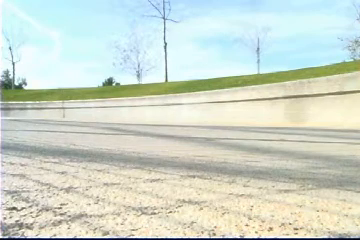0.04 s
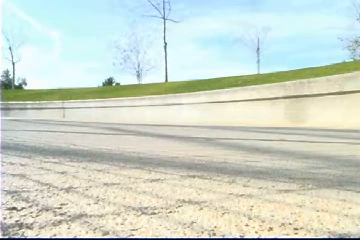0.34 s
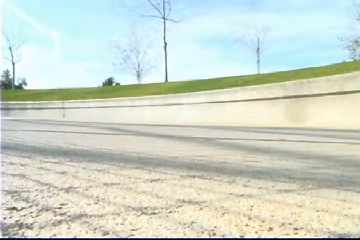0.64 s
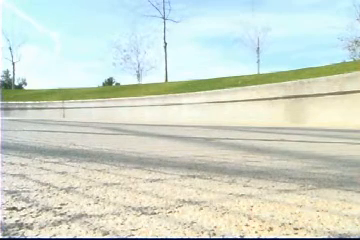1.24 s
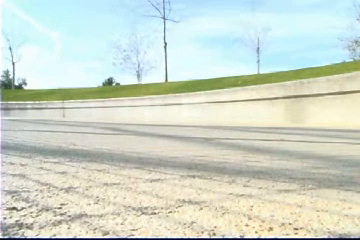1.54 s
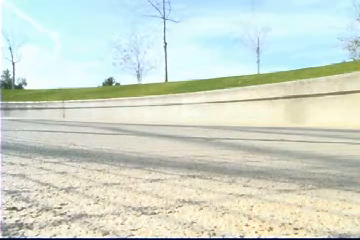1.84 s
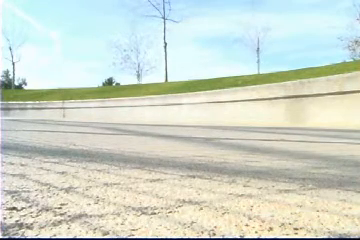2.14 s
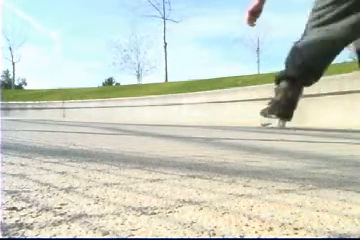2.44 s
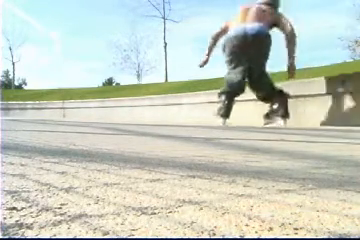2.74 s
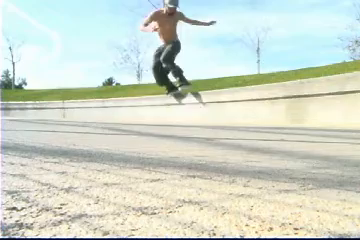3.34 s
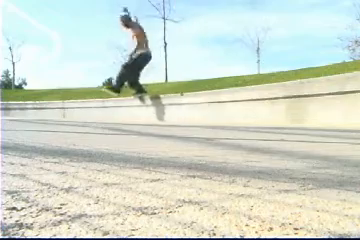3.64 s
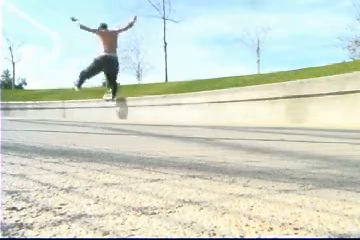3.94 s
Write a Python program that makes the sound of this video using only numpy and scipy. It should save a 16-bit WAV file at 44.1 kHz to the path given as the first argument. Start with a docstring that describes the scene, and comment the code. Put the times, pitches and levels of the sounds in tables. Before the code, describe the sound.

Inline skates roll over rough pavement, then slam onto a concrete ledge and grind along it.

```python
"""Inline skater grinding a ledge

A skater strides up over rough pavement and rolls close past, grit exciting the resonances of wheels
and frames, then jumps. The skates slam onto a concrete ledge, and stick-slip friction rings their
plastic soles as they grind along it, catching on the edge. Behind lie open air, a low distant hum
and a few faint bird chirps."""
import sys
import numpy as np
from scipy import signal
from scipy.fft import rfft, irfft
from scipy.io import wavfile

SR = 44100
rng = np.random.default_rng(int(sys.argv[2]) if len(sys.argv) > 2 else 0)


def pcm_store(signal):
    """Save signal as 16-bit PCM."""
    levels = np.round(np.clip(np.atleast_2d(signal), -1, 1) * 32767)
    wavfile.write(sys.argv[1], SR, levels.astype(np.int16).T)


N = 176400
T = np.arange(N) / SR
GRIND_START_S = 3.2

# Modes of the plastic sole and frame. Each row: frequency in Hz, width in Hz, gain in dB.
SOLE_MODES = [(298, 30, -1), (680, 108, 3.5), (1014, 7.7, 2.5), (2620, 110, -2.5), (3730, 110, 3)]
# Spectrum of the shaken boot. Each row: frequency in Hz, relative level in dB.
BOOT_SPECTRUM = [(20, -62), (120, -16), (290, -2.5), (550, -11.5), (5000, -76)]


def amp(db):
    """Amplitude grows tenfold with every 20 dB."""
    return 10 ** (np.asarray(db) / 20)


def unit(x):
    """Normalisation to an rms of 1."""
    return x / np.sqrt(np.mean(x ** 2) + 1e-20)


def value_at(points, hz):
    """Interpolation of a spectrum along a logarithmic frequency axis."""
    f, value = np.transpose(points)
    return np.interp(np.log(hz + 1), np.log(f + 1), value)


def envelopes(table):
    """Amplitude envelopes, one interpolated from each dB column of a table."""
    s, *columns = np.transpose(table)
    return [amp(np.interp(T, s, c)) for c in columns]


def add(mix, s, sound):
    """Superposition: a sound joins the mix at s seconds."""
    part = mix[round(s * SR):][:len(sound)]
    part += sound[:len(part)]


def colour(x, spectrum, modes=(), size=8192):
    """A minimum-phase filter of unit energy imposes a broad spectrum with resonance peaks."""
    hz = abs(np.fft.fftfreq(size, 1 / SR))
    peaks_db = sum(gain / (1 + (2 * (hz - f) / width) ** 2) for f, width, gain in modes)
    log_gain = np.log(amp(value_at(spectrum, hz) + peaks_db))
    response = np.exp(np.conj(signal.hilbert(log_gain)))
    taps = np.fft.ifft(response).real[:size // 2]
    return signal.oaconvolve(x, taps / np.linalg.norm(taps))[:N]


def wander(rate_hz):
    """Band-limited noise of rms 1 fluctuates smoothly, up to about rate_hz."""
    hz = np.fft.rfftfreq(N, 1 / SR)
    band = np.exp(-(hz / rate_hz) ** 2) * hz / (hz + rate_hz / 10)
    return unit(irfft(rfft(rng.standard_normal(N)) * band, N))


def grains(per_s, spread_db):
    """Shot noise: tiny random contacts, most small and a few large."""
    size = amp(spread_db * np.minimum(rng.exponential(1, N), np.log(60)))
    return unit(size * rng.choice([-1, 1], N) * (rng.random(N) < per_s / SR))


def burst(decay_s, size=8192):
    """Broadband excitation: a crush of contacts that decays exponentially."""
    fade = np.exp(-T[:size] / max(decay_s, 1 / SR))
    x = rng.standard_normal(size) * fade
    for _ in range(2):  # flatten the spectrum, then restore the decay
        x = irfft(np.exp(1j * np.angle(rfft(x)))) * np.sqrt(fade)
    return x * np.linalg.norm(fade) / np.linalg.norm(x)


def thud(hz, decay_s, rise_s=0.002):
    """Damped oscillation of a heavy struck body."""
    t = T[:SR // 2]
    return -np.sin(2 * np.pi * hz * t + np.pi / 4) * (1 - np.exp(-t / rise_s)) * np.exp(-t / decay_s)


def resonate(x, hz, width_hz):
    """A resonator of gain 1 passes a band that follows the curve hz."""
    turn = np.exp(2j * np.pi * np.cumsum(hz) / SR)
    pole = np.exp(-np.pi * width_hz / SR)
    return 2 * (turn * signal.lfilter([1 - pole], [1, -pole], x / turn + 1e-18)).real


def moving_contact(x, modes, drift, swell_db, ring_db, pace_hz=14):
    """As the point of excitation moves, each mode drifts in pitch, swells and fades."""
    out = x.copy()
    for hz, width_hz, _ in modes:
        swell = amp(ring_db + swell_db * np.tanh(wander(pace_hz)))
        out += swell * resonate(x, hz * (1 + drift * wander(pace_hz)), width_hz)
    return out


def distant_hum():
    """Steady noise with its energy in the bass is heard as a low hum."""
    # Spectrum of the open air. Each row: frequency in Hz, relative level in dB.
    spectrum = [(20, -47), (90, -11), (160, -1), (400, -18.5), (1000, -24), (6500, -48.5), (10000, -48)]
    return amp(-47) * colour(rng.standard_normal(N), spectrum)


def birds(rise_hz_per_s=6700, buzz_hz=1400):
    """Thin rising tones, roughened by random amplitude modulation."""
    # Each row: start in seconds, length in seconds, mid pitch in Hz, level in dB, roughness from 0 to 1.
    chirps = [(0.362, 0.061, 6130, -57.5, .8), (0.448, 0.056, 5330, -62, 0.5),
              (.87, 0.078, 7400, -62.5, 0.35)]
    out = np.zeros(N)
    for s, length, hz, db, rough in chirps:
        t = T[:round(length * SR)]
        pitch = hz + rise_hz_per_s * (t - length / 2)
        tone = np.sin(2 * np.pi * np.cumsum(pitch) / SR)
        buzz = 1 - rough + rough * wander(buzz_hz)[:len(t)]
        add(out, s, amp(db) * np.sin(np.pi * t / length) * tone * buzz)
    return out


def open_space(x, echo_s=0.014, echo_db=-29.5, tail_db=-17):
    """Reflection adds one echo from the ledge and a thin outdoor reverberation."""
    # Each row: frequency in Hz, time to decay by 60 dB in seconds.
    reverb_times = [(100, 0.055), (4000, 0.04), (10000, 1)]
    hz, t, noise = signal.stft(rng.standard_normal(SR // 2), SR, nperseg=256)
    decay = np.exp(-np.log(1000) * t / value_at(reverb_times, hz)[:, None])
    tail = signal.istft(noise * decay, SR, nperseg=256)[1]
    tail *= amp(tail_db) / np.linalg.norm(tail)
    tail[0] += amp(echo_db)
    out = x.copy()
    add(out, echo_s, signal.fftconvolve(x, tail))
    return out


def wheel_whirr(width_hz=340):
    """Narrow-band noise from the spinning wheels, sinking in pitch as they pass."""
    # Each row: time in seconds, pitch in Hz, level in dB relative to the wheel body.
    course = [(1.2, 1530, -9), (1.55, 1556, -4.5), (2.15, 1570, -12.5), (2.45, 1385, -5.5),
              (2.64, 1450, -9)]
    s, hz, db = np.transpose(course)
    pitch = np.interp(T, s, hz)
    band = resonate(rng.standard_normal(N), pitch, width_hz)
    return amp(np.interp(T, s, db)) * unit(resonate(band, pitch, width_hz))


def rolling():
    """Roughness excitation: grit under hard wheels hisses, shakes the frames and rumbles in the ground."""
    # Each row: time in seconds, then levels of wheel body, grit hiss and ground rumble in dB.
    roll_levels = [(0, -64, -83, -59), (.6, -61.5, -62.5, -55), (1.05, -64, -73.5, -50),
                   (1.18, -46.5, -53, -36.5), (1.4, -54.5, -75, -47.5), (1.75, -46.5, -60, -46),
                   (1.95, -44, -53.5, -37.5), (2.13, -38, -51.5, -37), (2.28, -31, -40, -44),
                   (2.37, -32.5, -36.5, -39.5), (2.52, -36.5, -44, -44), (2.74, -35, -43, -44),
                   (2.85, -33.5, -40, -36.5), (2.97, -32.5, -43, -39.5), (3.08, -55.5, -59.5, -56)]
    # Spectra of those three layers. Each row: frequency in Hz, relative level in dB.
    wheel_spectrum = [(30, -49.5), (170, 4.5), (380, -1), (750, 2), (1100, -7), (2100, -15.5),
                      (5000, -33.5)]
    grit_spectrum = [(100, -39), (1200, 5.5), (2500, 5), (4600, 2.5), (6600, -6), (9500, -8.5),
                     (16000, -66)]
    ground_spectrum = [(15, -69), (45, -1.5), (85, 3), (120, 7), (200, -34), (2000, -42)]
    # Modes of wheels and frame. Each row: frequency in Hz, width in Hz, gain in dB.
    frame_modes = [(591, 37, 1.5), (1134, 190, -5), (4480, 1300, 0)]
    body, hiss, rumble = envelopes(roll_levels)
    bumps = amp(.7 * wander(rate_hz=20))
    wheels = colour(body * bumps * grains(per_s=5000, spread_db=-2.0), wheel_spectrum, frame_modes)
    wheels = moving_contact(wheels, frame_modes, drift=.03, swell_db=7, ring_db=-11)
    grit = colour(hiss * bumps * grains(per_s=14000, spread_db=4.5), grit_spectrum, frame_modes)
    whirr = body * wheel_whirr()
    ground = colour(rumble * rng.standard_normal(N), ground_spectrum)
    return wheels + whirr + grit + ground


def strides(thud_lag_s=0.00078, knock_ratio=2.815):
    """Each wheel impact excites the shell's modes; the boot then thuds, with a hollow overtone."""
    # Each row: start in seconds, clack level in dB, clack decay in seconds, clack ring in Hz,
    # knock level in dB, thud level in dB, thud pitch in Hz.
    set_downs = [(0.278, -47.5, 0.011, 3600, -27, -26, 241), (0.345, -35.5, 0.0022, 3070, -24, -24, 214),
                 (0.526, -43, 0.03, 2300, -28, -27, 212), (1.08, -36.5, 0.0081, 2750, -23, -13, 203),
                 (1.094, -38.5, 0.0082, 2870, -45, -24.5, 260), (1.163, -28.5, 0.002, 2430, -30, -25, 144),
                 (1.543, -47.5, 0.01, 2720, -28, -46, 236), (1.792, -38, 0.013, 2210, -32, -24.5, 227),
                 (1.825, -28, 0.00083, 2640, -26, -12, 245), (1.880, -21, 0.0019, 7040, -49, -16.5, 184),
                 (2.583, -16.5, 0.0018, 3770, -25, -2.5, 207), (2.604, -23.5, 0.0064, 3380, -6, -25, 238),
                 (2.671, -15.5, 0.0036, 5530, -2, -2, 136)]
    # Each row: frequency in Hz, relative level in dB.
    clack_spectrum = [(60, -5), (400, 10.5), (800, 7.5), (2000, 0.5), (4000, -2.5), (5600, -8), (9000, -8),
                      (16000, -34)]
    # Modes of the boot shell. Each row: frequency in Hz, width in Hz, gain in dB.
    shell_modes = [(360, 94, 3), (1115, 80, 5.5)]
    out = np.zeros(N)
    for s, clack_db, decay_s, ring_hz, knock_db, thud_db, hz in set_downs:
        modes = [*shell_modes, (ring_hz, .4 * ring_hz, 8)]
        strike = burst(decay_s)
        scuff = amp(-9.5) * burst(decay_s=0.012)
        clack = amp(clack_db) * colour(strike + scuff, clack_spectrum, modes)
        add(out, s, clack)
        add(out, s + rng.uniform(.002, .0034), amp(-6) * clack)  # the next wheel touches down
        knock = amp(knock_db) * thud(knock_ratio * hz, decay_s=0.0027)
        add(out, s + thud_lag_s, amp(thud_db) * thud(hz, decay_s=0.0041) + knock)
    return out


def booms():
    """Ground and ledge vibrate in damped low modes as the skater's weight comes down."""
    # Each row: start in seconds, level in dB, pitch in Hz, decay in seconds.
    loads = [(1.096, -23.5, 80, 0.041), (1.839, -18.5, 94.5, 0.017), (2.588, -25, 102.6, 0.079),
             (3.269, -10.5, 298.5, 0.0088)]
    out = np.zeros(N)
    for s, db, hz, decay_s in loads:
        add(out, s, amp(db) * thud(hz, decay_s))
    return out


def pavement_reflection(x, first_lag_ms=1.35, shrink_ms_per_s=.9, cutoff_hz=4000):
    """Comb filtering: a dull reflection lags less as the skater slides away, so the notches rise."""
    lag_s = (first_lag_ms - shrink_ms_per_s * np.maximum(T - GRIND_START_S, 0)) / 1000
    low_pass = np.exp(-(np.fft.rfftfreq(N, 1 / SR) / cutoff_hz) ** 2)
    dull = irfft(rfft(x) * low_pass, N)
    return x + amp(-9) * np.interp(T - lag_s, T, dull)


def sole_squeal(start_s=3.226, length_s=.06, mid_hz=3550, sag_hz_per_s=6800):
    """A narrow resonance whistles as the sole takes the weight, and sags as the skate slows."""
    since = T - start_s
    pitch = mid_hz - sag_hz_per_s * (np.clip(since, 0, length_s) - length_s / 2)
    whistle = unit(resonate(rng.standard_normal(N), pitch, width_hz=160))
    swell = np.sqrt(abs(np.sin(np.pi * np.clip(since / length_s, 0, 1))))
    return amp(-42.5) * whistle * swell


def ledge_blows(ring_width_hz=160, ring_gain_db=9, thud_hz=193, thud_s=0.004):
    """Impacts on the ledge crack, thud and excite a short ring whose pitch depends on the spot struck."""
    # Blows and rattles of the skates. Each row: start in seconds, ring level in dB, ring pitch in Hz,
    # crack level in dB, thud level in dB.
    blows = [(3.084, -28.5, 2000, -38.5, -63), (3.141, -77, 3500, -43.5, -65),
             (3.1984, -4.5, 1940, -11, -6.5), (3.231, -20, 970, -41, -25), (3.2790, -7, 1080, -21.5, -21.5),
             (3.3676, -19.5, 1940, -41, -39), (3.381, -13, 2570, -30, -35), (3.4001, -17.5, 840, -36, -33),
             (3.407, -16, 1710, -35, -20), (3.4644, -17.5, 1900, -40.5, -37),
             (3.546, -24.5, 2000, -50, -43), (3.599, -16.5, 2160, -33.5, -30), (3.861, -31, 1200, -55, -34),
             (3.974, -22, 1500, -51, -28.5)]
    # Spectra of ring and crack. Each row: frequency in Hz, relative level in dB.
    ring_spectrum = [(50, -19), (300, -9.5), (900, 8), (2100, 6), (3600, -6), (5000, -32), (11000, -26)]
    crack_spectrum = [(100, -51), (1500, 4), (5300, 7.5), (8500, 6), (16000, -27)]
    # Modes of the hard frame that ring only when struck. Each row: frequency and width in Hz, gain in dB.
    ping_modes = [(6670, 160, 8), (8100, 360, 5.5)]
    rings, cracks, thuds = np.zeros((3, N))
    for s, ring_db, hz, crack_db, thud_db in blows:
        modes = [*SOLE_MODES, (hz, ring_width_hz, ring_gain_db)]
        add(rings, s, amp(ring_db) * colour(burst(decay_s=0.0022), ring_spectrum, modes))
        add(cracks, s, amp(crack_db) * burst(decay_s=0.0029))
        add(thuds, s, amp(thud_db) * thud(thud_hz, thud_s))
        add(thuds, s, amp(thud_db - 4.5) * colour(burst(thud_s), BOOT_SPECTRUM, SOLE_MODES))
    return rings + colour(cracks, crack_spectrum, SOLE_MODES + ping_modes) + thuds


def grind(boot_db=-31, boot_fall_db_per_s=19):
    """Stick-slip friction: plastic crosses concrete in clumps of tiny jerks that ring sole and boot."""
    # Each row: time in seconds, scrape level in dB, hiss level in dB.
    grind_levels = [(3.2, -34.5, -27), (3.24, -37, -78), (3.27, -28.5, -34.5), (3.3, -35.5, -48.5),
                    (3.33, -24.5, -39), (3.39, -32.5, -47), (3.44, -35, -55), (3.485, -31, -54),
                    (3.52, -44, -58), (3.59, -33, -51), (3.635, -34.5, -53.5), (3.685, -27.5, -40),
                    (3.74, -30.5, -49), (3.81, -32, -48.5), (3.85, -47.5, -64), (3.93, -43, -58),
                    (3.985, -36.5, -46.5)]
    # Spectra of scrape and hiss. Each row: frequency in Hz, relative level in dB.
    scrape_spectrum = [(60, -24), (250, 6.5), (750, 0.5), (1450, 5.5), (2300, 0.5), (3600, -13.5),
                       (4500, -21), (11000, -27)]
    hiss_spectrum = [(200, -29), (3700, 6), (5200, -4), (6600, -2.5), (9500, -3.5), (16000, -37)]
    scrape_gain, hiss_gain = envelopes(grind_levels)
    since = T - GRIND_START_S
    touching = since > 0
    chatter = wander(rate_hz=170)
    slips = amp(2.74 * chatter) * grains(per_s=13000, spread_db=3.5)
    fine_slips = amp(3.3 * chatter) * grains(per_s=16000, spread_db=2.0)
    shudder = amp(boot_db - boot_fall_db_per_s * since) * rng.standard_normal(N)
    rasp = colour(touching * scrape_gain * slips, scrape_spectrum, SOLE_MODES)
    rasp = moving_contact(rasp, SOLE_MODES, drift=.04, swell_db=8, ring_db=-6)
    hiss = colour(touching * hiss_gain * fine_slips, hiss_spectrum, SOLE_MODES)
    boot = colour(touching * shudder, BOOT_SPECTRUM, SOLE_MODES)
    return rasp + hiss + boot


def scene():
    """Superposition of skater, birds and their reflections over the distant hum, in one channel."""
    hum = distant_hum()
    ledge = pavement_reflection(ledge_blows() + grind()) + sole_squeal()
    direct = rolling() + strides() + booms() + ledge + birds()
    return (open_space(direct) + hum)[None]


def record(dry, low_cut_hz=70, high_cut_hz=10810, ceiling=.7, band_edge_hz=16890):
    """A band-limited microphone loses deep bass and top treble, and clips on the hardest blows."""
    hz = np.fft.rfftfreq(2 * N, 1 / SR)
    thin = signal.sosfilt(signal.butter(2, low_cut_hz, "high", fs=SR, output="sos"), dry)
    dull = irfft(rfft(thin, 2 * N) / np.sqrt(1 + (hz / high_cut_hz) ** 56))[:, :N]
    clipped = np.clip(dull, -ceiling, ceiling)
    low_pass = signal.firwin(511, band_edge_hz, window=("kaiser", 9), fs=SR)
    return signal.oaconvolve(clipped, low_pass[None], "same")


dry = scene()
out = record(dry)
pcm_store(out)
```